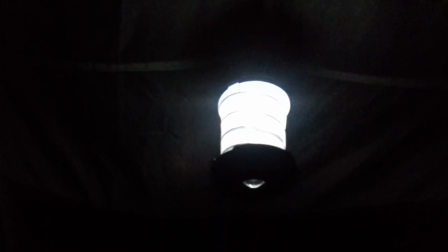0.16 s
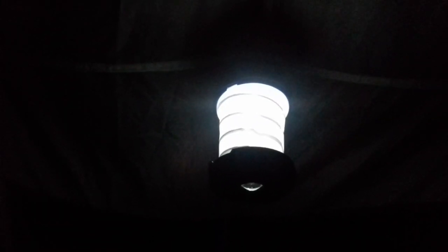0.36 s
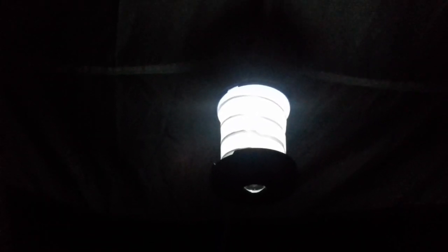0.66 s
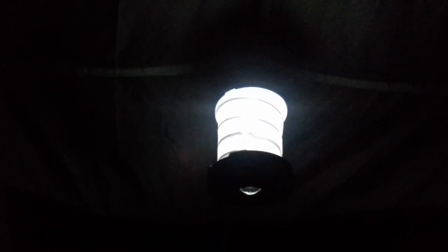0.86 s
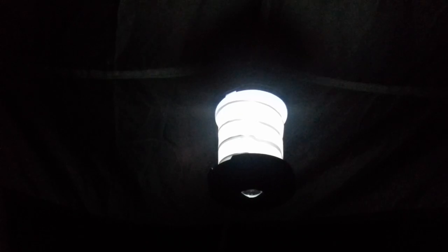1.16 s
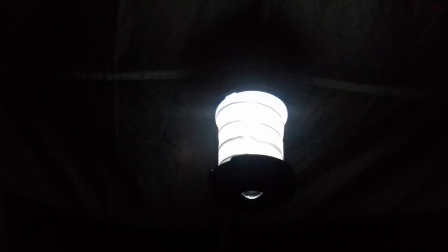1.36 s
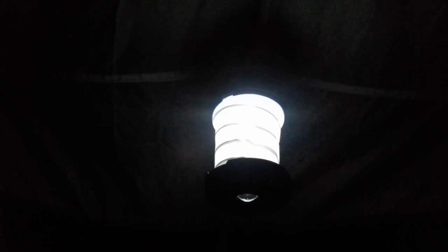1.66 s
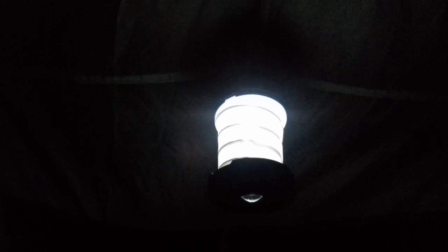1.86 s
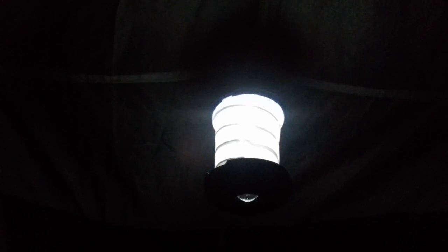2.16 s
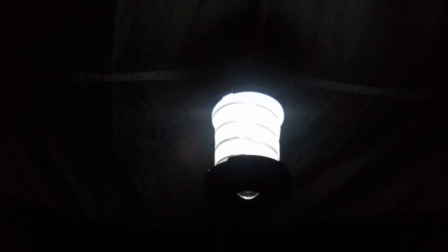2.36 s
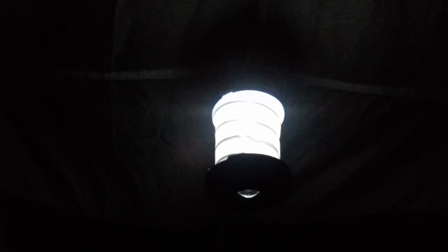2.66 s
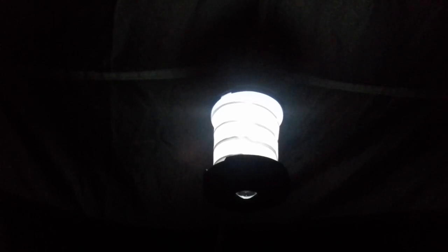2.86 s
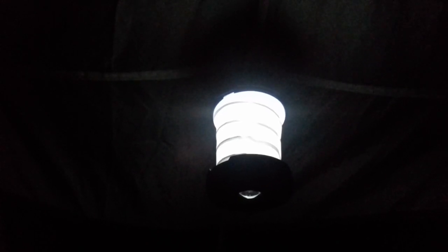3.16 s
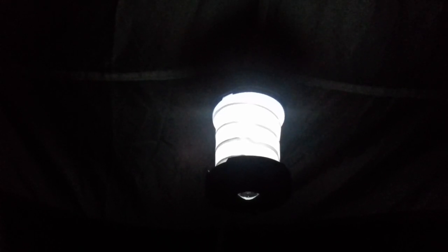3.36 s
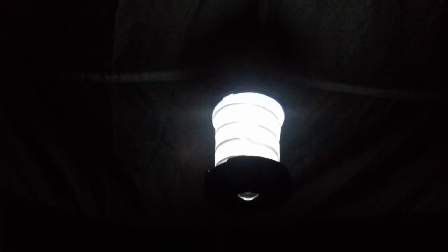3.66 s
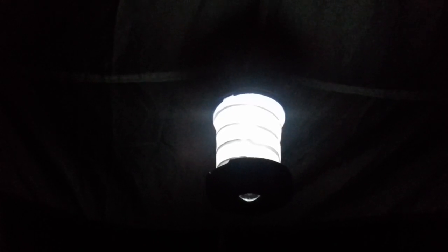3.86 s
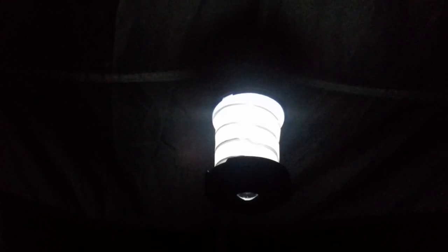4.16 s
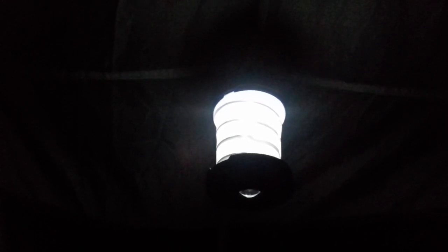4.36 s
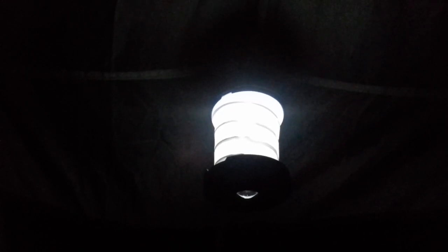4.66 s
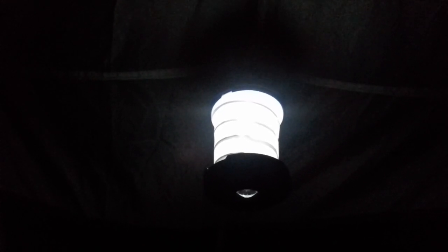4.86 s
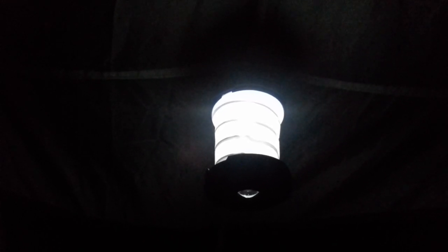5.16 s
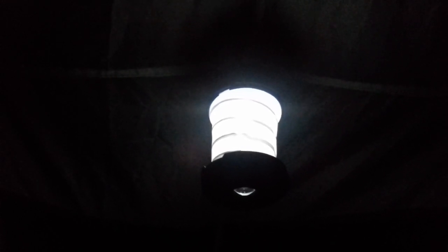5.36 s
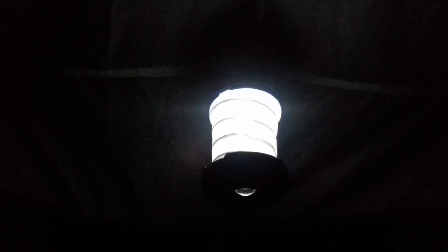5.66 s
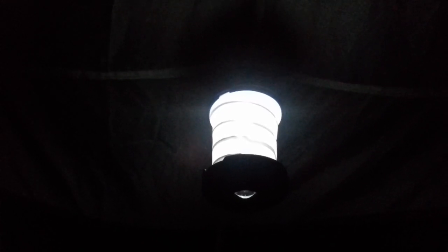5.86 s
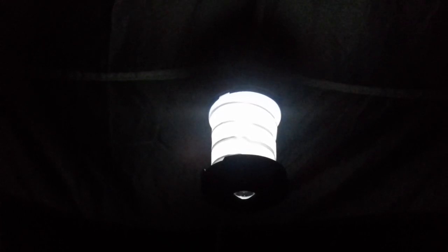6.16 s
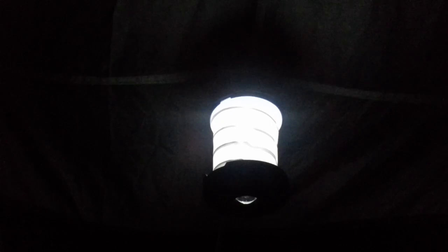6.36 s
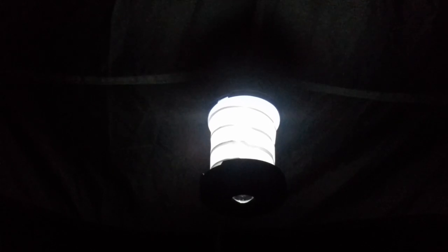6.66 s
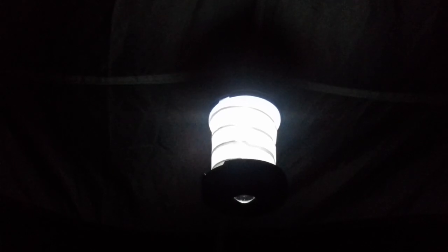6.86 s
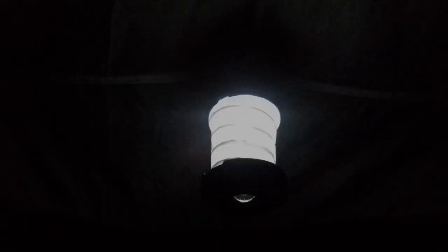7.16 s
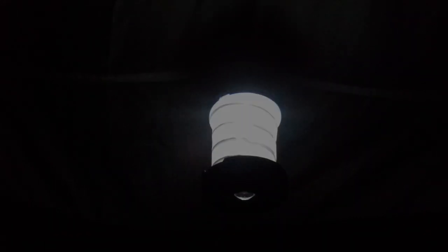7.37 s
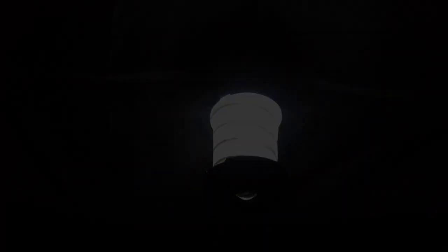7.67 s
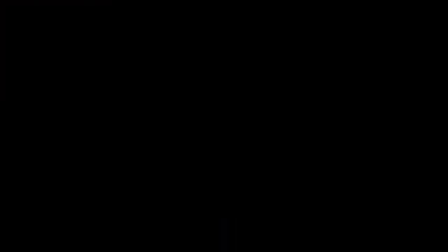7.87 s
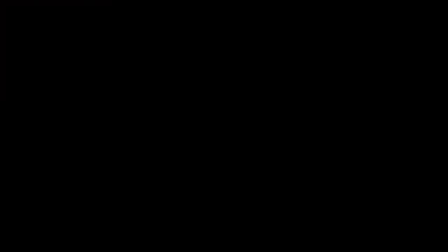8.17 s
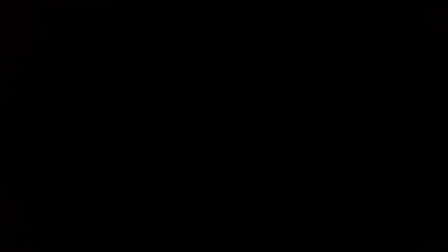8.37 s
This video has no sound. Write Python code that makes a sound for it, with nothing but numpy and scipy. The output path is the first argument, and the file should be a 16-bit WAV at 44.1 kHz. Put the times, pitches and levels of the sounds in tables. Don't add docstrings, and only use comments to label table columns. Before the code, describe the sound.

From inside a small tent, countless raindrops tap the stretched cloth above, blending into an even, busy crackle. Larger drops strike irregularly, some crisp and snapping, others duller with a small thud, clustering most strongly around three seconds. Late on, the rain is clipped short for an instant and fades back in beneath separate drops. Dry, close, nearly mono sound with muffled highs and light stereo hiss.

```python
import sys
import numpy as np
from scipy import signal
from scipy.fft import rfft, irfft, next_fast_len
from scipy.io import wavfile
from scipy.ndimage import uniform_filter1d

SR = 44100
rng = np.random.default_rng(int(sys.argv[2]) if len(sys.argv) > 2 else 0)


def put_to_file(sound):
    columns = np.atleast_2d(sound).T
    safe = np.clip(columns, -1, 1)
    whole_steps = np.round(safe * 32767)
    wavfile.write(sys.argv[1], SR, whole_steps.astype(np.int16))


def decibels_to_gain(level_db):
    exponent = np.asarray(level_db, float) / 20
    return 10 ** exponent


N = 375291
CHANGE_S, FADE_S = 7.9425, 0.095
TAP_SAMPLES, LEAD_SAMPLES = 1024, 14

# start in seconds, peak in dB, ring in Hz, thud in dB against the ring.
HEAVIEST = [(0.5085, -7.5, 2870, -12.5), (0.62, -3, 2970, -21), (0.8343, -6.5, 2860, -25),
            (1.033, -9.5, 2090, -17), (2.0572, -8, 1890, -22), (2.3, -7.5, 3290, -18.5),
            (2.46, -7, 2080, -13.5), (2.7569, -7.5, 2170, -22), (2.904, -3.7, 2450, -26),
            (2.9258, -5, 2460, -18), (3.0033, -3.5, 1940, -17), (3.0246, -4.5, 2120, -16),
            (3.0275, -0.5, 2450, -27), (3.2028, -6.5, 2200, -18), (3.2739, -8.5, 3300, -33),
            (3.336, -9, 2300, -17), (3.4973, -7.5, 2480, -15), (3.8343, -7, 2380, -18),
            (4.274, -6.5, 1840, -15), (4.4228, -6.5, 2820, -26), (4.7099, -9, 1920, -6),
            (4.782, -7, 2480, -25), (4.992, -6.5, 2050, -30), (5.489, -5.5, 2130, -24),
            (6.255, -5.5, 2200, -24), (6.4736, -6.5, 2900, -24), (7.171, -7, 2770, -25),
            (7.302, -8.5, 2620, -30), (7.65, -10.5, 2550, -18), (8.2529, -8, 1940, -16)]
# start in seconds, peak in dB, ring in Hz.
CRISP_DROPS = [(0.012, -9.5, 2560), (0.2892, -7, 2920), (0.354, -10.5, 1890), (0.831, -8, 2600),
               (1.0791, -10.5, 2130), (1.3646, -11.5, 2450), (1.6863, -8.5, 2360), (1.8295, -13, 3100),
               (2.5969, -9, 2830), (2.6283, -11, 2080), (3.224, -9.5, 2380), (3.465, -8.5, 2350),
               (3.784, -10, 2200), (4.1026, -11, 2800), (4.1228, -10.5, 2080), (4.283, -13, 1580),
               (4.3042, -9, 2240), (4.311, -10, 2560), (4.3484, -9, 2340), (4.3563, -8.5, 2800),
               (4.5495, -14, 2600), (5.4843, -11.5, 2560), (5.68, -12, 2350), (6.1834, -7.5, 2740),
               (6.5362, -6, 2970), (7.107, -11, 2150), (7.261, -12, 2050), (7.4675, -7.5, 2040),
               (7.722, -9, 2780), (8.041, -10.5, 2900)]
# start in seconds, peak in dB, ring in Hz.
DULL_DROPS = [(0.1494, -8.5, 2350), (0.1906, -14.5, 2880), (0.2278, -10, 2040), (0.376, -19, 2070),
              (0.4334, -12.5, 1670), (0.704, -14, 2090), (0.929, -11.5, 2200), (0.988, -11.5, 2260),
              (1.188, -9, 1920), (1.9591, -9, 2030), (2.05, -11, 1960), (2.3292, -14, 2880),
              (2.4655, -11, 2210), (3.0979, -13, 2100), (3.408, -14, 2200), (3.4311, -8, 1790),
              (3.9211, -8.5, 2190), (4.762, -10.5, 2100), (4.9608, -11, 2010), (5.1185, -11.5, 1380),
              (5.5829, -8.5, 2210), (6.3608, -10.5, 2760), (6.4337, -12.5, 2420), (6.6122, -9, 1790),
              (6.7853, -10.5, 2280), (6.9164, -9, 2000), (7.082, -9, 2470), (7.8054, -8.5, 2570),
              (7.9184, -9.5, 2300), (7.9335, -8.5, 2180)]
# start in seconds, peak in dB, ring in Hz.
RETURN_DROPS = [(7.9803, -20, 2000), (8.004, -17, 2500), (8.0685, -17, 3200), (8.1083, -14.5, 2790),
                (8.141, -18, 2600), (8.1624, -12, 2090), (8.2384, -15, 2300), (8.3131, -14.5, 1500),
                (8.3946, -12, 2400), (8.4025, -14, 2000), (8.4393, -15, 2200), (8.4575, -14, 2290),
                (8.485, -21, 2800)]


def big_drops():
    drops = list(HEAVIEST)
    for table, thud_db in ((CRISP_DROPS, -21.5), (DULL_DROPS, -13.5), (RETURN_DROPS, -16.5)):
        drops += [(*drop, thud_db) for drop in table]
    start_s, peak_db, ring_hz, thud_db = np.transpose(drops)
    rows = taps(ring_hz, thud_db + 16, width=0.92, rattle_db=-21.5, rattle_t60_s=0.028, lumpy_db=3.0)
    return scatter(rows, start_s, peak_db - 0.6)


# frequency in Hz, gain in dB.
CLOTH_RESPONSE = [(30, -52), (120, -11), (400, -9), (1000, 2.5), (2200, -2), (3500, -3.5), (3900, -8.5),
                  (4500, -18.5), (5400, -31.5), (7300, -33.5), (9500, -48.5), (20000, -102)]


def taps(ring_hz, thud_db, width, rattle_db, rattle_t60_s, lumpy_db):
    t = np.arange(TAP_SAMPLES) / SR
    hz = np.arange(TAP_SAMPLES // 2 + 1) * SR / TAP_SAMPLES
    chance = rng.standard_normal((len(ring_hz), TAP_SAMPLES + TAP_SAMPLES // 32))

    lumps = decibels_to_gain(lumpy_db * np.repeat(chance[:, TAP_SAMPLES:], 32, axis=1))
    ending = np.clip((0.021 - t) / 0.012, 0, 1) * (t > 0.0003)
    push = decibels_to_gain(rattle_db - 60 * t / rattle_t60_s) * lumps * chance[:, :TAP_SAMPLES] * ending
    push[:, 0] = np.sign(chance[:, 0] - 0.9)

    r = 1j * hz / ring_hz[:, None]
    ring = width * r / (1 + width * r + r ** 2)
    low = 1j * hz / 560
    thud = decibels_to_gain(thud_db)[:, None] * 1.8 * low / (1 + 1.81 * low + low ** 2) * low / (0.29 + low)
    high = (hz / 6500) ** 2
    spray = decibels_to_gain(-4.5 + 6.4 * chance[:, 1:2]) * high / (1 + high ** 2)

    body = ring * (ring + 0.38) + thud + spray
    rows = irfft(rfft(push) * body * causal(slope(CLOTH_RESPONSE, hz)))
    return rows / np.abs(rows[:, :2 * LEAD_SAMPLES]).max(axis=1, keepdims=True)


def slope(table, hz):
    table_hz, db = np.transpose(table)
    return np.interp(np.log(np.maximum(hz, 1)), np.log(table_hz), db)


def causal(db):
    cepstrum = irfft(db * np.log(10) / 20)
    half = len(cepstrum) // 2
    cepstrum[1:half] *= 2
    cepstrum[half + 1:] = 0
    return np.exp(rfft(cepstrum))


def scatter(rows, start_s, db):
    at = (start_s * SR).astype(int)[:, None] + np.arange(rows.shape[1])
    sized = rows * decibels_to_gain(db)[:, None]
    line = np.bincount(at.ravel(), sized.ravel(), N + TAP_SAMPLES + SR)
    return line[LEAD_SAMPLES:N + LEAD_SAMPLES]


def any_drops(count, spread_octaves, rattle_db, rattle_t60_s):
    patch, heavy = rng.random((count, 2)).T
    ring_hz = 2300 * 2 ** (spread_octaves * (patch - 0.5))
    thud_db = -3 + 10 * (heavy - 0.5)
    return taps(ring_hz, thud_db, width=1.0, rattle_db=rattle_db, rattle_t60_s=rattle_t60_s, lumpy_db=4.5)


# time in seconds, level in dB.
PATTER_LEVEL = [(0.0, -30.5), (0.66, -31), (0.83, -31), (1.54, -31), (1.73, -32.5), (2.25, -31.5),
                (2.7, -32.5), (2.87, -31.5), (3.46, -31.5), (3.72, -32), (5.14, -30.5), (5.33, -33.5),
                (5.57, -31.5), (7.7, -30.5), (8.1, -35), (8.41, -32), (8.51, -31.5)]


def middling_drops():
    drops_per_s, top_db, range_db = 44, 19, 7.5
    when, size = rng.random((int(drops_per_s * CHANGE_S), 2)).T
    start_s = when * CHANGE_S
    peak_db = np.interp(start_s, *np.transpose(PATTER_LEVEL)) + top_db - range_db * size
    rows = any_drops(count=len(start_s), spread_octaves=1.1, rattle_db=-25, rattle_t60_s=0.015)
    return scatter(rows, start_s, peak_db)


def patter():
    drops_per_s, kinds = 750, 2000
    when, size = rng.random((int(drops_per_s * N / SR), 2)).T
    size_db = np.minimum(-4.0 * np.log(size + 1e-9), 11)
    rows = any_drops(count=kinds, spread_octaves=1.3, rattle_db=-22, rattle_t60_s=0.016)
    rows = rows[np.arange(len(when)) % kinds]
    small = level(scatter(rows, when * N / SR, size_db), 0)
    swell_db = np.interp(np.arange(N) / SR, *np.transpose(PATTER_LEVEL))
    return small * decibels_to_gain(swell_db - 0.5)


def level(x, db):
    return x * decibels_to_gain(db) / np.sqrt(np.mean(x ** 2))


# start in seconds, peak in dB, pitch in Hz.
SPLASH_TICKS = [
    (.8802, -37, 6200),
    (1.1872, -36, 6500),
    (3.6128, -30, 5960),
    (4.4442, -37, 6250),
    (5.1133, -39, 6200),
]


def splashes():
    start_s, peak_db, hz = np.transpose(SPLASH_TICKS)
    t = np.arange(256) / SR
    shape = t / 0.00026 * np.exp(1 - t / 0.00019)
    fizz = np.diff(rng.standard_normal((len(start_s), 257))) * np.exp(-t / 0.0015) * 0.12
    return scatter(shape * np.sin(2 * np.pi * hz[:, None] * t) + fizz, start_s, peak_db)


# frequency in Hz, density in dB per Hz.
WASH_SPECTRUM = [(25, -26), (55, -16), (120, -11.5), (300, -4.5), (900, -11.5), (2300, -3.5), (3600, -7),
                 (4500, -18.5), (5500, -35), (9000, -54)]


def wash():
    noise = coloured(lambda hz: decibels_to_gain(slope(WASH_SPECTRUM, hz)), channels=1)[0]
    return level(noise * decibels_to_gain(1.1 * walk(25)), -42.5)


def coloured(gain_at, channels):
    size = next_fast_len(N)
    gain = gain_at(np.arange(size // 2 + 1) * SR / size)
    return irfft(rfft(rng.standard_normal((channels, size))) * gain, size)[:, :N]


def walk(rate_hz):
    hold = int(SR / rate_hz)
    steps = np.repeat(rng.standard_normal(N // hold + 1), hold)
    return 1.3 * uniform_filter1d(steps, hold)[:N]


# frequency in Hz, density in dB per Hz.
HISS_SPECTRUM = [(15, -40), (25, -13), (156, -6), (500, -4), (2300, -16), (4000, -11.5), (5800, -15.5),
                 (10000, -15.5), (13000, -16.5), (20000, -16.5)]
# time in seconds, level in dB.
HISS_DRIFT = [(0, 2), (1.5, 2), (4.2, 2.1), (5, 1), (8.5, 0.4)]


def hiss():
    notch_hz, notch_width_hz = SR / 4, 1000
    whine_hz, whine_db = 12296, -88

    def gain(hz):
        off_hz = np.abs(hz - notch_hz) + 60
        return decibels_to_gain(slope(HISS_SPECTRUM, hz)) * off_hz / np.hypot(off_hz, notch_width_hz / 2)

    t = np.arange(N) / SR
    drift = decibels_to_gain(np.interp(t, *np.transpose(HISS_DRIFT)) + 0.85 * walk(30))
    whine = decibels_to_gain(whine_db) * np.sqrt(2) * np.sin(2 * np.pi * whine_hz * t)
    return level(coloured(gain, channels=2), -54) * drift + whine


def scene():
    since_s = np.arange(N) / SR - CHANGE_S
    rise = 0.06 + (np.maximum(since_s, 0) / (1.4 * FADE_S)) ** 1.2
    fade = uniform_filter1d(np.where(since_s < 0, 1, np.clip(rise, 0, 1)), 30)
    chop = uniform_filter1d(np.where((since_s > 0) & (since_s < 0.03), 0., 1.), 30)
    steady = middling_drops() + patter() + wash()
    rain = big_drops() * chop + steady * fade + splashes()
    return np.tile(rain, (2, 1))


def band_limit(x):
    return signal.sosfilt(signal.butter(12, 17030, fs=SR, output="sos"), x)


def record(dry):
    since_s = np.arange(N) / SR - CHANGE_S
    fade = np.where(since_s < 0, 1, np.clip(0.3 + since_s / (2.2 * FADE_S), 0, 1))
    mix = np.tanh(0.79 * dry) / 0.8 + (hiss() - 0.0026) * fade
    top_cut = signal.ellip(16, 0.5, 80, 15860, fs=SR, output="sos")
    mix = signal.sosfilt(top_cut, mix)
    return band_limit(mix)


dry = scene()
out = record(dry)
put_to_file(out)
```